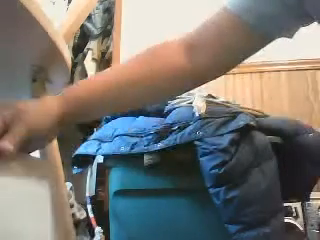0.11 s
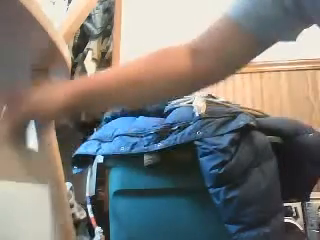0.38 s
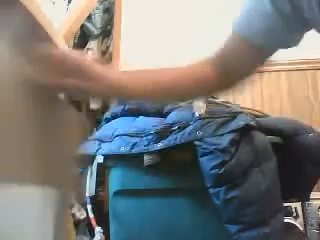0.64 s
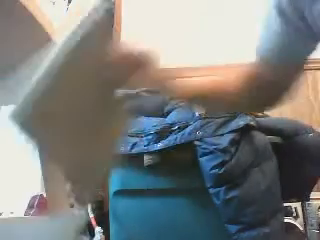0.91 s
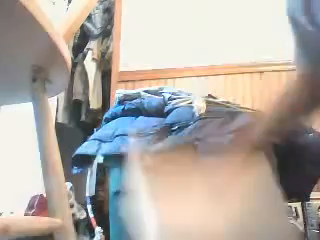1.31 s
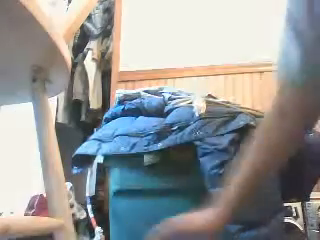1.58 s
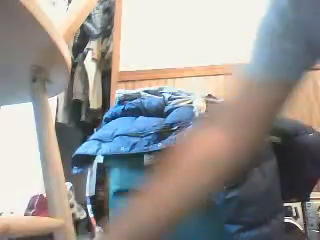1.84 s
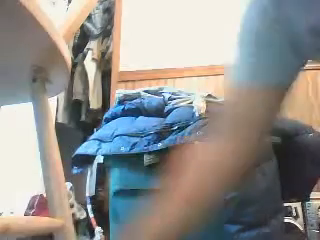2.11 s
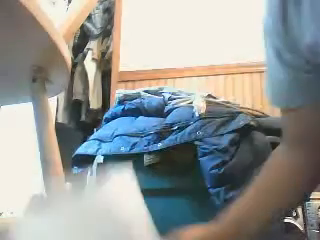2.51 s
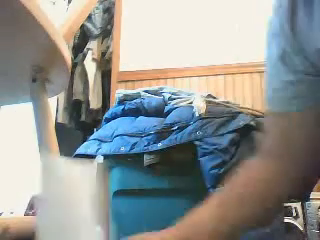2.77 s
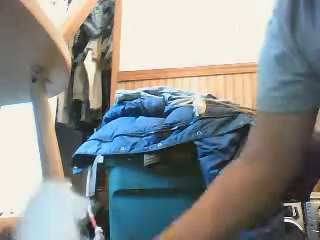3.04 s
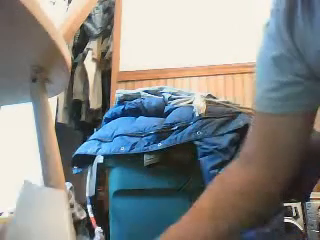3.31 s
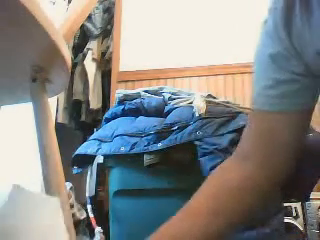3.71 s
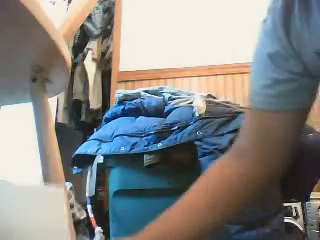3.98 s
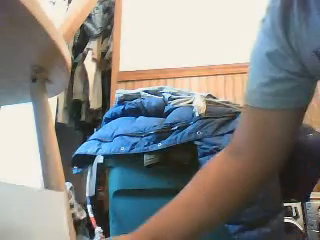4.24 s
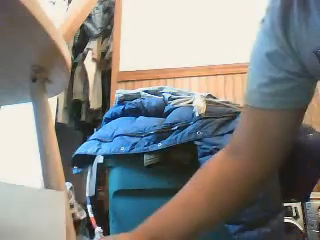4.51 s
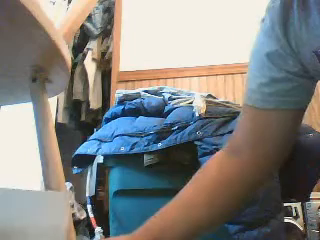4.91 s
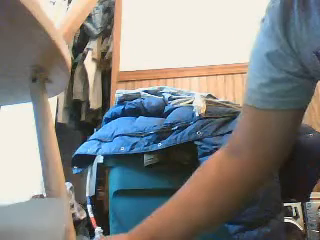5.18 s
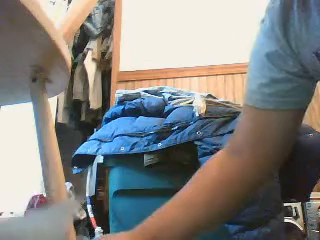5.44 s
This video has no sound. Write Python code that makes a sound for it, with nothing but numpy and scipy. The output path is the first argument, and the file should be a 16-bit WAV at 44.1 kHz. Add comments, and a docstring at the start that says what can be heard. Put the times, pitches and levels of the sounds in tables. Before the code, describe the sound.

Paper and cardboard snap, crackle and scrape as they are handled in a small room, over faint hum and hiss.

```python
"""A paper target on a cardboard backing is handled in a small room, over hum, hiss and a soft rumble.
First a fingertip squeaks on the card, and the sheets snap and crackle as they bend and are tapped.
The target is lifted, then rubs along the floor and is stood up, loudest at about two seconds.
After a lull with little but the background, a soft rustle and a few last snaps end the scene."""
import sys
import numpy as np
from scipy import signal
from scipy.fft import rfft, irfft
from scipy.io import wavfile

SR = 44100
rng = np.random.default_rng(int(sys.argv[2]) if len(sys.argv) > 2 else 0)


def log_audio(samples):
    """Write samples as a 16-bit WAV file to the path given in sys.argv[1]."""
    # one column per channel
    frames = np.atleast_2d(samples).T
    # limit to full scale, then quantise
    limited = np.clip(frames, -1, 1)
    pcm = np.round(limited * 32767).astype(np.int16)
    wavfile.write(sys.argv[1], SR, pcm)


N = 243431
TIME = np.arange(N) / SR
LEAD_S = .015   # fibres start to give this long before a snap


def from_db(db):
    """Turn decibels into a factor to multiply a sound by."""
    return 10 ** (np.asarray(db) / 20)


def rms_one(x):
    """Scale a signal so that its average strength (rms) is 1."""
    return x / np.sqrt(np.mean(x ** 2) + 1e-20)


def drift(per_s):
    """Wander around zero, heading for a new random value per_s times a second."""
    targets = rng.standard_normal(2000)
    return rms_one(np.interp(TIME * per_s, np.arange(len(targets)), targets))


def envelope(start, length, attack_s, release_s):
    """Rise to 1 at the start, hold, then fade; attack and release each cover 60 dB."""
    early = np.maximum(start - TIME, 0)
    late = np.maximum(TIME - start - length, 0)
    return from_db(-60 * np.minimum(early / attack_s + late / release_s, 3))


def colour(x, spectrum):
    """Make some pitches louder and others softer, following rows of f/Hz, level/dB."""
    size = 4096
    hz, db = np.transpose(spectrum)
    grid_hz = np.maximum(np.arange(size // 2 + 1) * SR / size, 1)
    gains = from_db(np.interp(np.log(grid_hz), np.log(hz), db))
    # fold the filter so that it never sounds before its input (minimum phase)
    cepstrum = irfft(np.log(gains))
    cepstrum[1:size // 2] *= 2
    cepstrum[size // 2 + 1:] = 0
    click_response = irfft(np.exp(rfft(cepstrum)))
    return signal.fftconvolve(x, click_response)[:len(x)]


def resonance(x, hz, width_hz):
    """Let a sound ring at one pitch; the narrower the width, the longer it rings."""
    r = np.exp(-np.pi * width_hz / SR)
    feedback = [1, -2 * r * np.cos(2 * np.pi * hz / SR), r * r]
    return signal.lfilter(np.array([1, 0, -1]) * (1 - r * r) / 2, feedback, x)


def grains(samples, per_s, spread_db):
    """Fibres catch and let go, making tiny random clicks of uneven size."""
    sizes = from_db(spread_db * np.minimum(rng.exponential(1, samples), 4))
    signs = rng.choice([-1, 1], samples)
    clicks = rng.random(samples) < per_s / SR
    return rms_one(sizes * signs * clicks)


def hiss():
    """A steady hiss with a faint, flickering whine in it."""
    # tone of the hiss: f/Hz, level/dB
    hiss_tone = [(25, -8), (90, -11), (140, 7.5), (250, 1), (400, 0), (600, -2), (1200, -1), (2100, -4),
                 (3300, -7), (4500, -9.5), (6200, -13), (7600, -13.5), (9200, -22), (11000, -60)]
    # narrow bands of noise that whine: f/Hz, width/Hz, level/dB
    whine_bands = [(2194, 23, -79), (4300, 27, -83), (4917, 110, -73), (5640, 60, -85), (7400, 270, -88.5)]
    sound = from_db(-63.5) * rms_one(colour(rng.standard_normal(N), hiss_tone))
    for hz, width_hz, db in whine_bands:
        whine = resonance(rng.standard_normal(N), hz, width_hz)
        flicker = from_db(3 * drift(per_s=14))
        sound += from_db(db) * rms_one(whine * flicker)
    return sound


def rumble():
    """A soft, low noise that comes and goes."""
    # swells of the rumble: start/s, length/s, level/dB
    swells = [(0, 0.037, -53), (0.184, 0.22, -63), (0.592, 0.11, -63), (3.235, 0.35, -63),
              (4.156, 0.06, -63), (4.319, 0.034, -56), (4.586, 0.018, -56), (4.8, 0.11, -60.5),
              (5.038, 0.023, -55), (5.272, .02, -55.5)]
    # tone of the rumble: f/Hz, level/dB
    rumble_tone = [(90, -43.5), (135, 14.5), (170, 16), (200, 8), (240, -7.5), (400, -47)]
    levels = [from_db(db) * envelope(start, length, attack_s=.39, release_s=.28)
              for start, length, db in swells]
    return np.max(levels, axis=0) * rms_one(colour(rng.standard_normal(N), rumble_tone))


def hum():
    """Electrical hum at twice the mains rate; about three times a second it dips and its wave slips back."""
    hum_hz, first_dip_s, dip_every_s = 120.5, .143, .352
    turn = 2 * np.pi * (TIME - first_dip_s) / dip_every_s
    dip = np.exp(6 * (np.cos(turn) - 1))
    slip = -.75 * np.arctan2(np.sin(turn), 1.1 - np.cos(turn))
    level_db = -62.5 - 11 * dip + .25 * drift(per_s=8.6)
    return from_db(level_db) * np.sqrt(2) * np.sin(2 * np.pi * hum_hz * TIME + slip)


def room(x):
    """Coats and clutter leave only a short, smooth tail of echoes."""
    fade_s, first_echo_s = .22, .004
    t = TIME[:SR // 2]
    echoes = rng.standard_normal(len(t)) * from_db(-60 * t / fade_s) * (t > first_echo_s)
    return signal.fftconvolve(x, echoes / np.sqrt(np.sum(echoes ** 2)))[:N]


def squeak():
    """A fingertip slips unevenly on the card, which rings at one pitch."""
    hz, width_hz = 1633, 130
    pressure = envelope(start=0, length=.15, attack_s=.044, release_s=.25)
    slips = grains(N, per_s=1500, spread_db=4)
    ringing = resonance(resonance(slips, hz, width_hz), hz, 2 * width_hz)
    return from_db(-60) * pressure * rms_one(ringing)


def flap():
    """Bumps bend the whole board, which answers with a low, dull flap."""
    # bumps against the board: t/s, level/dB
    bumps = [(.585, -57), (1.438, -49), (1.573, -48), (2.12, -58.5), (2.178, -49.5)]
    # tone of the flapping board: f/Hz, level/dB
    flap_tone = [(40, -50), (90, -13), (140, 0), (210, 3), (310, -1), (430, -1.5), (700, -35)]
    bend = sum(from_db(db) * envelope(start, 0, attack_s=.16, release_s=.19) for start, db in bumps)
    return bend * rms_one(colour(grains(N, per_s=1200, spread_db=2.5), flap_tone))


def stroke(start, length):
    """How strongly the sheets move: they shift softly, slide, then creep as they settle."""
    slide = envelope(start, length, attack_s=.044, release_s=.11)
    creep = from_db(-12) * envelope(start, length, attack_s=.21, release_s=.6)
    return np.maximum(slide, creep)


def sheet_ring(low_hz, high_hz, width_hz, per_s, patchy_db, count):
    """As the rubbing spot moves, its clicks make the sheet ring now at one pitch, now at another."""
    pitches = np.linspace(low_hz, high_hz, count) + rng.normal(0, width_hz / 4, count)
    ringing = 0
    for hz in pitches:
        clicks = grains(N, per_s, spread_db=1.5) * from_db(patchy_db * drift(per_s=45))
        ringing += resonance(clicks, hz, width_hz)
    return rms_one(ringing)


def rustle():
    """Sliding card makes a coarse rasp, and the paper on it a finer, brighter one."""
    # slides and bends of the sheets: start/s, length/s, card level/dB, paper level/dB
    strokes = [(0, 0.093, -62.5, -59.5), (0.128, 0.1, -65, -64), (0.323, 0.021, -62.5, -55),
               (0.417, .07, -64, -64), (.5, 0.03, -58.5, -53.5), (0.584, 0.02, -54, -55),
               (0.648, 0.12, -59, -59.5), (0.878, 0.033, -64.5, -69), (1.021, 0.0087, -57.5, -62.5),
               (1.258, 0.15, -61.5, -64), (1.409, 0.05, -44.5, -48), (1.459, 0.027, -48.5, -47),
               (1.51, 0.068, -47.5, -50), (1.747, 0.0062, -70, -60.5), (1.927, 0.045, -45, -46.5),
               (1.97, 0.055, -37.5, -37.5), (2.045, 0.0089, -42.5, -37.5), (2.093, 0.042, -41.5, -46.5),
               (2.18, 0.026, -39.5, -41.5), (2.235, 0.012, -56, -50.5), (2.32, 0.028, -54.5, -55.5),
               (2.402, 0.0085, -57.5, -69), (2.509, .004, -57, -62), (2.742, 0.01, -50.5, -77),
               (2.85, .008, -57, -62), (3.134, 0.012, -60.5, -60.5), (5.19, 0.29, -68.5, -66)]
    # tone of rubbed card: f/Hz, level/dB
    card_tone = [(40, -14), (100, -6), (170, -9.5), (300, -7.5), (550, -1), (1100, -2), (1700, -0.5),
                 (2500, -3), (3500, -4), (6000, -56)]
    # tone of rubbed paper: f/Hz, level/dB
    paper_tone = [(1500, -32.5), (2800, -4.5), (4400, 1), (5600, -1.5), (6900, -1.5), (7800, -2),
                  (9300, -4), (11000, -57)]
    card_gain, paper_gain = 0, 0
    for start, length, card_db, paper_db in strokes:
        motion = stroke(start, length)
        card_gain = np.maximum(card_gain, from_db(card_db) * motion)
        paper_gain = np.maximum(paper_gain, from_db(paper_db) * motion)
    card_ring = sheet_ring(800, 2900, width_hz=150, per_s=600, patchy_db=3.5, count=11)
    paper_ring = sheet_ring(3000, 7100, width_hz=280, per_s=1000, patchy_db=3.2, count=13)
    card = colour(.65 * grains(N, per_s=3000, spread_db=3) + .5 * card_ring, card_tone)
    paper = colour(.51 * grains(N, per_s=3200, spread_db=4.5) + paper_ring, paper_tone)
    waver = rms_one(from_db(1.5 * drift(per_s=90)))   # a sliding sheet sticks and slips
    return waver * (card_gain * rms_one(card) + paper_gain * rms_one(paper))


def thump_level(when, fade_s, flex_db, flex_hz):
    """How hard a snap shakes the whole board, in dB."""
    lifted_s, landed_s = .78, 1.38
    force_db = .37 * (flex_db + 42.5)   # a harder bend thumps more
    contact_db = 3 * np.log2(fade_s / .032)   # so does a longer contact
    panel_db = -5 * np.log2(flex_hz / 1590)   # small, high-ringing panels thump less
    carried_db = -5 * (lifted_s < when < landed_s)   # so does a board held in the air
    return -55 + force_db + contact_db + panel_db + carried_db


def snap_part(fade_s, tone, hz, width_hz, ring_db, lead_db, rise_s):
    """Fibres give, the sheet buckles, and a crackle dies away while a panel of the sheet rings."""
    # the pitches a bent panel rings at: multiple of its main pitch, level/dB
    panel_modes = [(.72, -13.5), (1.002, 5.5), (1.36, -5)]
    t = TIME[:SR // 6] - LEAD_S
    after, before = np.maximum(t, 0), np.minimum(t, 0)
    dying = from_db(-60 * after / fade_s)
    giving = from_db(lead_db + 60 * before / (.61 * fade_s))
    buckling = 1 - np.exp(-after / rise_s)
    force = grains(len(t), per_s=14000, spread_db=1) * dying * np.maximum(giving, buckling)
    ringing = sum(from_db(ring_db + db) * resonance(force, hz * multiple, width_hz)
                  for multiple, db in panel_modes)
    sound = colour(force + ringing, tone)
    span_s = .01   # every part gets the energy of a sound of strength 1 lasting this long
    return sound * np.sqrt(span_s * SR / np.sum(sound ** 2))


def snaps():
    """Each snap or tap thumps the whole board, flexes a panel of it and cracks the paper."""
    # snaps and taps: t/s, base fade time/s, flex level/dB, crack level/dB, flex f/Hz, crack f/Hz
    events = [(0.046, 0.048, -69, -48.5, 2600, 4280), (0.242, 0.029, -56.5, -65, 1230, 3000),
              (0.553, 0.12, -55, -58, 680, 3300), (0.5625, 0.061, -41.5, -40, 1000, 3040),
              (0.633, 0.023, -56.5, -48, 1830, 5000), (0.685, 0.043, -53.5, -66, 1450, 4200),
              (0.762, 0.036, -50, -57, 1170, 2970), (0.7925, 0.039, -51.5, -52.5, 2560, 4500),
              (0.81, 0.038, -50, -44.5, 2460, 2960), (0.859, 0.016, -55, -62, 1420, 3210),
              (1.067, 0.057, -46.5, -59, 1880, 3020), (1.083, 0.019, -47, -58, 1810, 3020),
              (1.14, 0.017, -40, -48, 2520, 2900), (1.348, .031, -46.5, -47, 1790, 4100),
              (1.394, 0.053, -45, -48.5, 1420, 3150), (1.515, 0.023, -35.5, -40.5, 1710, 4370),
              (1.564, 0.046, -44.5, -47.5, 1260, 4070), (1.602, 0.049, -47, -48, 2580, 3400),
              (1.964, 0.018, -32, -32, 1160, 5100), (2.0, .012, -34, -30.5, 2520, 4500),
              (2.016, 0.025, -31.5, -33, 1920, 4620), (2.074, 0.04, -33, -39, 1720, 2970),
              (2.098, 0.054, -36.5, -37.5, 1690, 4300), (2.119, .04, -40, -39.5, 1690, 4250),
              (2.169, 0.06, -31, -23.5, 1450, 4420), (2.177, 0.036, -30, -27, 2420, 3370),
              (2.277, 0.017, -48.5, -39, 1170, 4260), (2.299, 0.026, -46.5, -53, 1510, 4200),
              (2.341, 0.064, -44.5, -47.5, 1680, 4440), (2.477, 0.018, -51.5, -64, 1660, 4650),
              (2.516, 0.018, -50, -43, 1590, 3300), (2.574, 0.02, -60, -79, 1650, 3360),
              (2.605, 0.012, -61.5, -65, 980, 2940), (2.735, 0.045, -51, -48, 2770, 2940),
              (2.833, 0.026, -46.5, -40.5, 1470, 3300), (4.756, 0.018, -55.5, -59.5, 1830, 4120),
              (5.26, 0.1, -45.5, -63, 1610, 3110), (5.296, 0.019, -45.5, -39, 1620, 3600),
              (5.4223, 0.014, -38.5, -39, 1525, 4950)]
    # tone of the board's low thump: f/Hz, level/dB
    thump_tone = [(40, -24), (90, -14.5), (170, 0.5), (300, -4), (480, -5), (700, -2), (1100, -9.5),
                  (2500, -101)]
    # tone of the flexing card: f/Hz, level/dB
    flex_tone = [(400, -22), (800, -1), (1100, 4.5), (1600, 1.5), (2300, -0.5), (2850, -8), (4500, -44)]
    # tone of the paper's bright crack: f/Hz, level/dB
    crack_tone = [(1500, -12.5), (2750, -2.5), (3350, 2.5), (5000, 2.5), (6800, -2), (7800, -10.5),
                  (9300, -19), (11000, -36.5)]
    track = np.zeros(N + SR)
    for when, fade_s, flex_db, crack_db, flex_hz, crack_hz in events:
        thump_db = thump_level(when, fade_s, flex_db, flex_hz)
        thump = snap_part(fade_s * 2, thump_tone, hz=196,
                          width_hz=45, ring_db=-14, lead_db=-9.5, rise_s=.0009)
        flex = snap_part(fade_s * 1.72, flex_tone, flex_hz,   # card stops ringing fast: a wide band
                         width_hz=290, ring_db=12.5, lead_db=-10, rise_s=.0002)
        crack = snap_part(fade_s * 1.74, crack_tone, crack_hz,
                          width_hz=460, ring_db=-1.5, lead_db=-12.5, rise_s=.00014)
        snap = from_db(thump_db) * thump + from_db(flex_db) * flex + from_db(crack_db) * crack
        start = max(round((when - LEAD_S) * SR), 0)
        track[start:start + len(snap)] += snap
    return track[:N]


def scene():
    """The handled sheets and their echoes in the room, over the background."""
    sheets = snaps() + rustle() + flap() + squeak()
    background = hiss() + rumble() + hum()
    return (sheets + from_db(-14) * room(sheets) + background)[None]


def record(dry):
    """The small microphone loses the highest treble."""
    cutoff_hz = 11000
    return signal.sosfilt(signal.ellip(10, .3, 80, cutoff_hz, fs=SR, output="sos"), dry)


dry = scene()
out = record(dry)
log_audio(out)
```